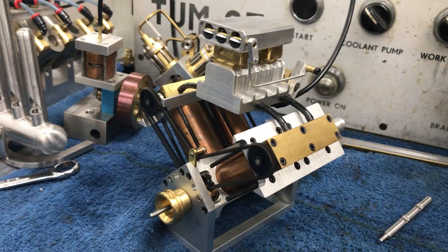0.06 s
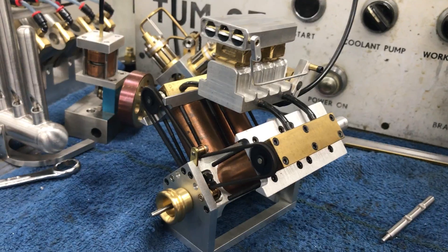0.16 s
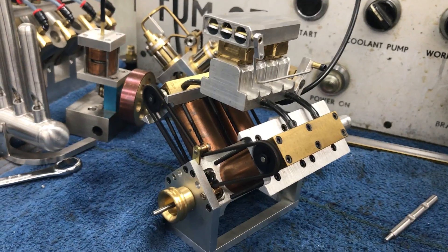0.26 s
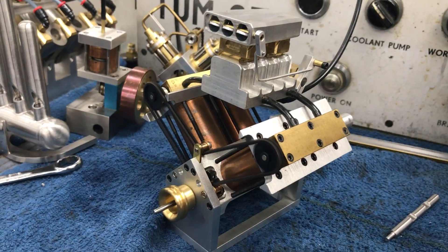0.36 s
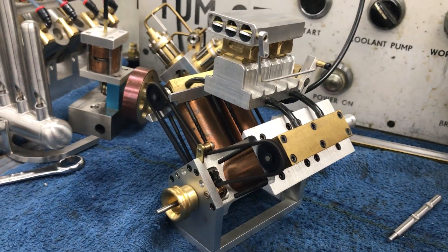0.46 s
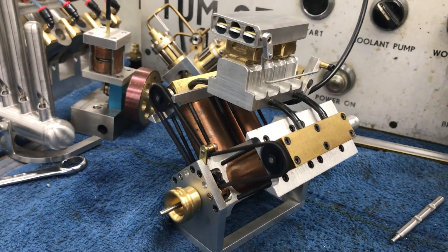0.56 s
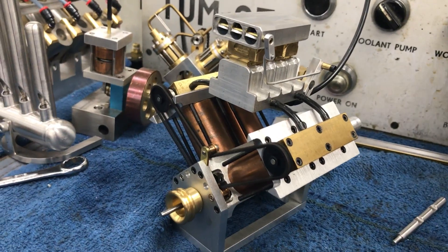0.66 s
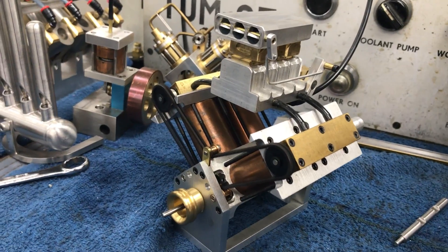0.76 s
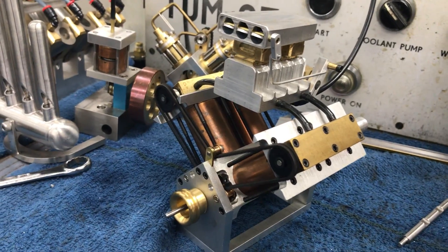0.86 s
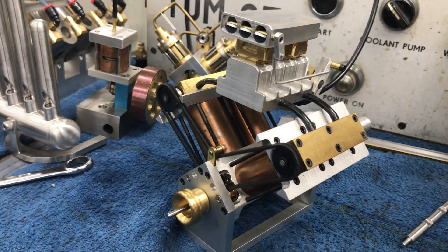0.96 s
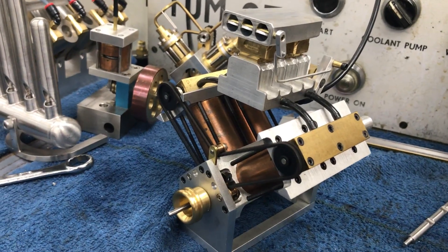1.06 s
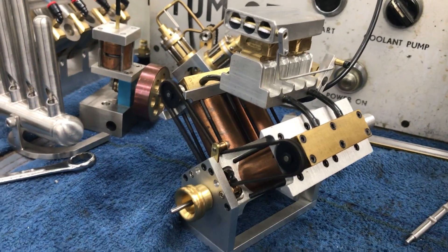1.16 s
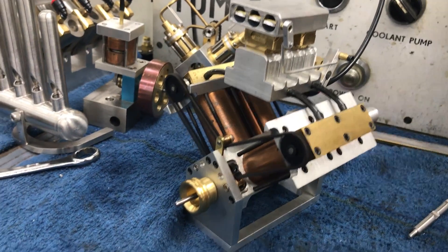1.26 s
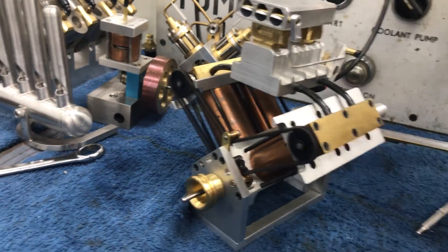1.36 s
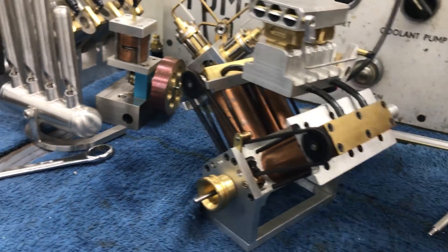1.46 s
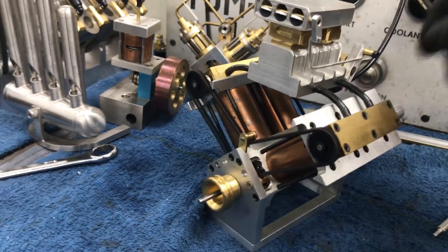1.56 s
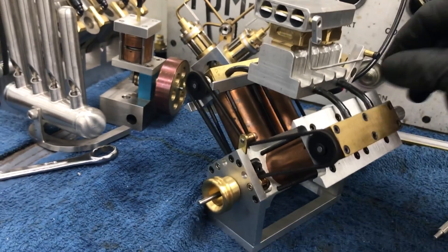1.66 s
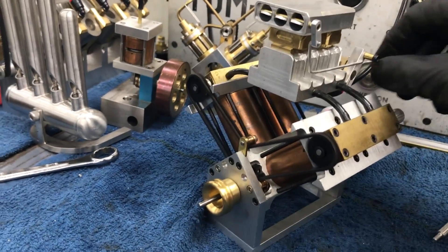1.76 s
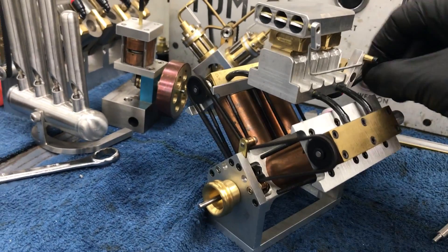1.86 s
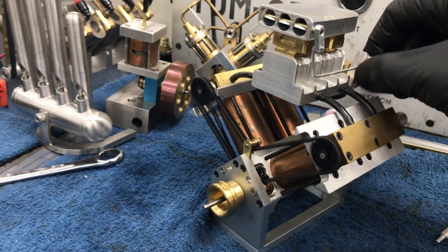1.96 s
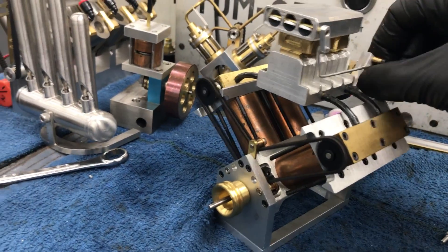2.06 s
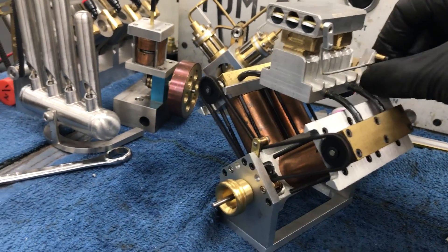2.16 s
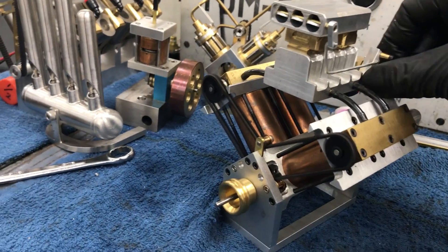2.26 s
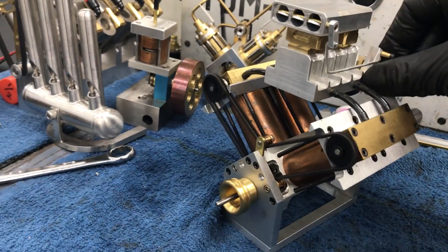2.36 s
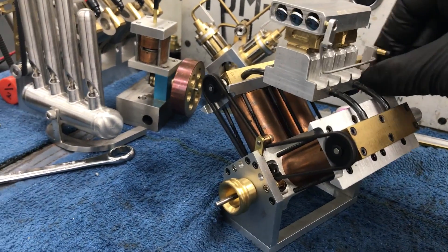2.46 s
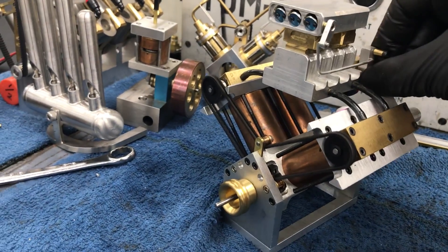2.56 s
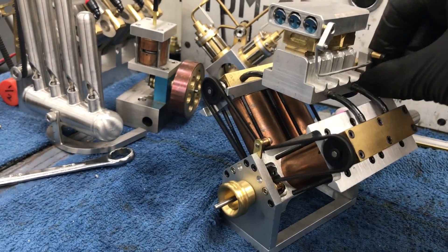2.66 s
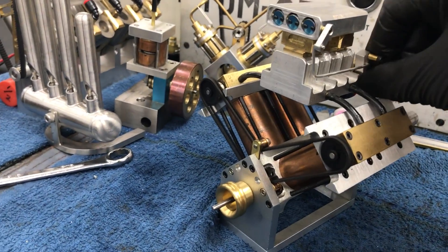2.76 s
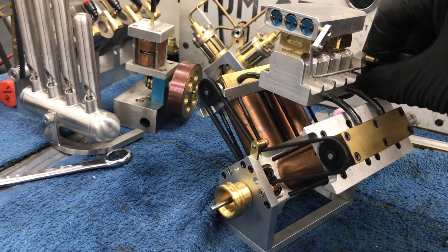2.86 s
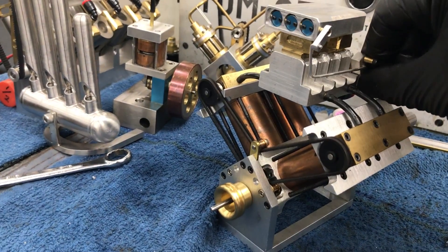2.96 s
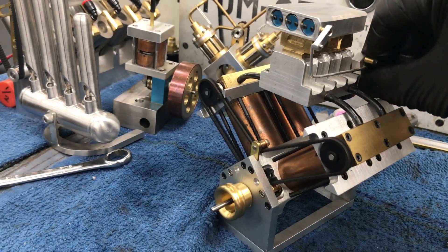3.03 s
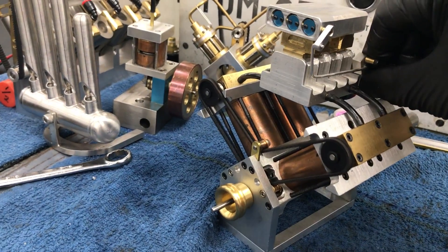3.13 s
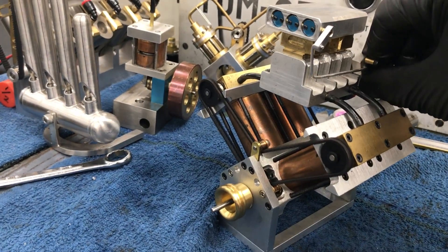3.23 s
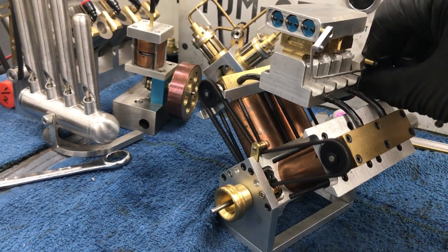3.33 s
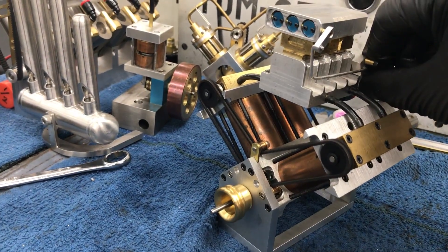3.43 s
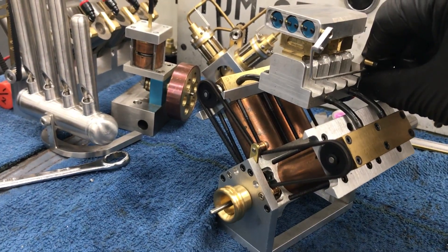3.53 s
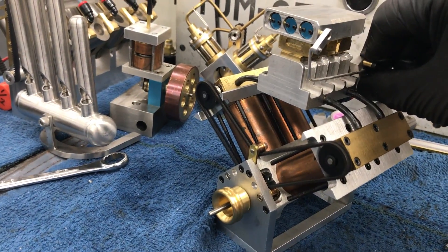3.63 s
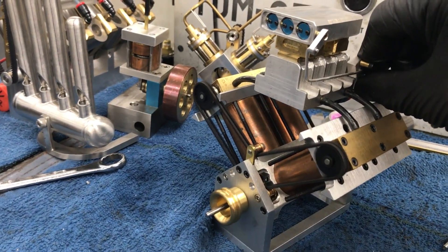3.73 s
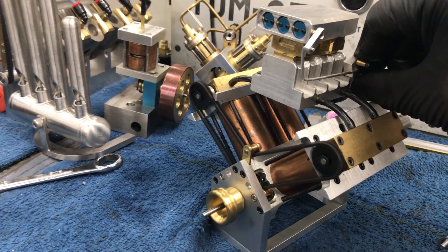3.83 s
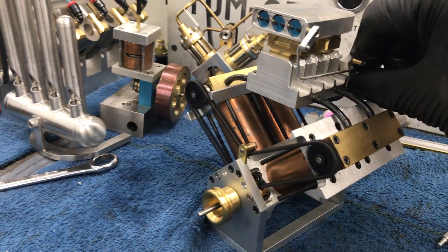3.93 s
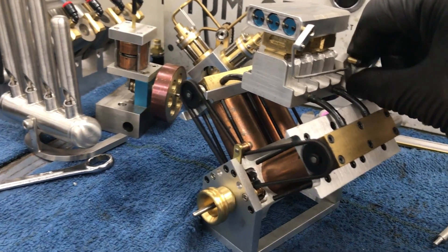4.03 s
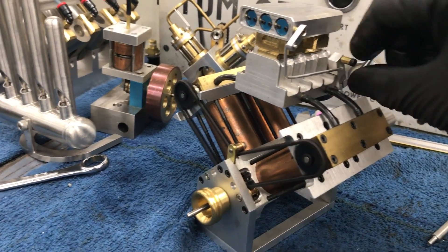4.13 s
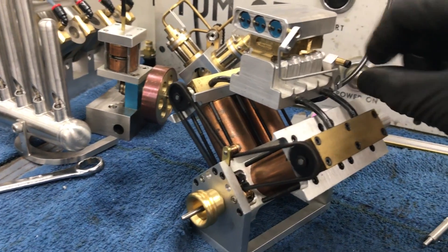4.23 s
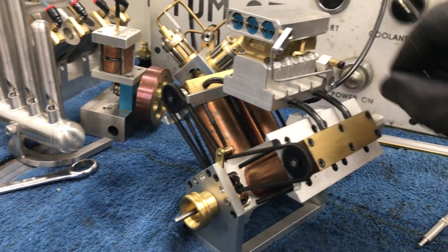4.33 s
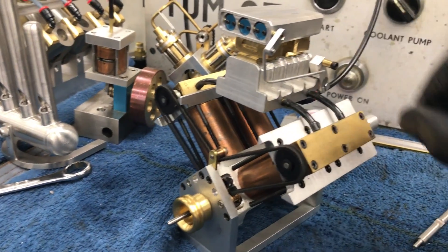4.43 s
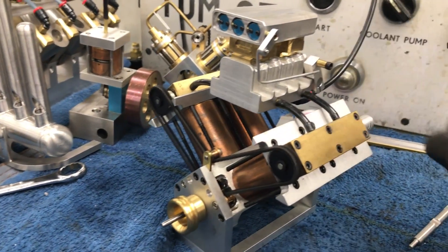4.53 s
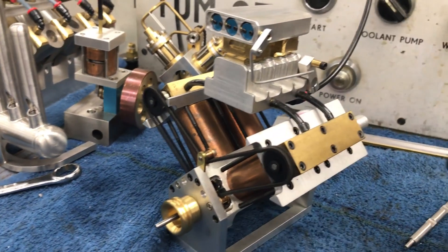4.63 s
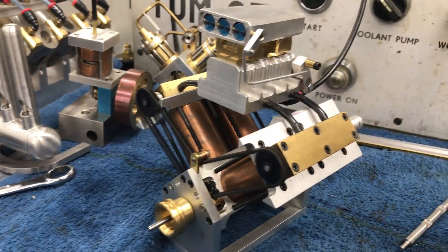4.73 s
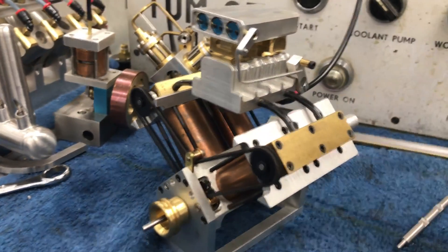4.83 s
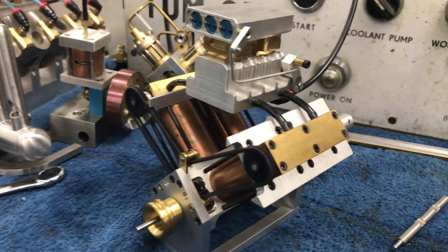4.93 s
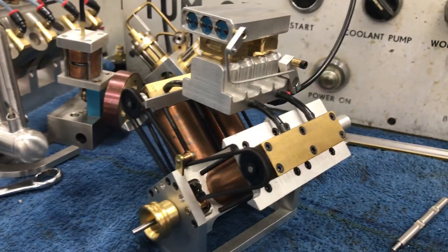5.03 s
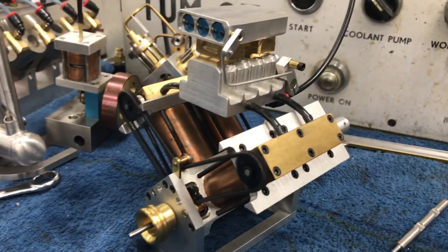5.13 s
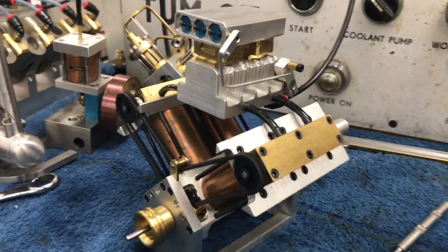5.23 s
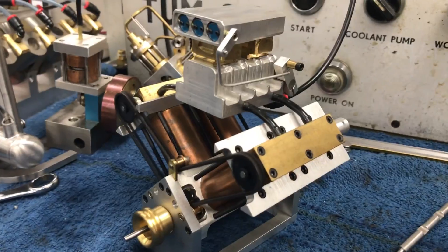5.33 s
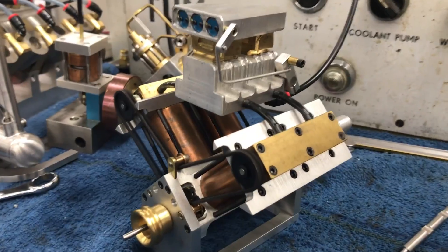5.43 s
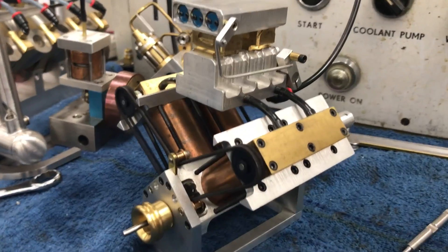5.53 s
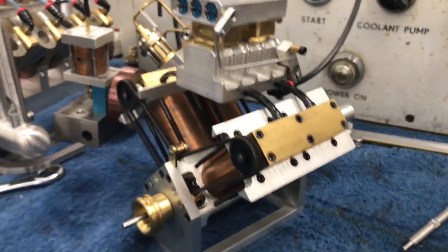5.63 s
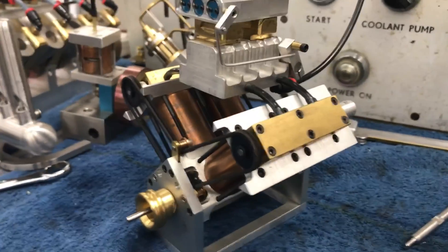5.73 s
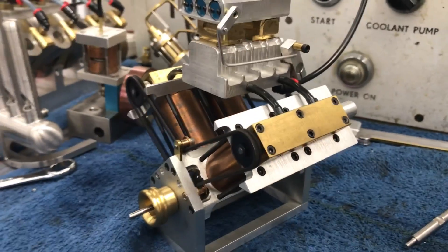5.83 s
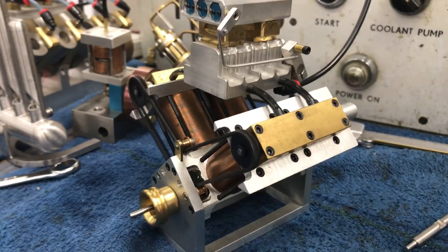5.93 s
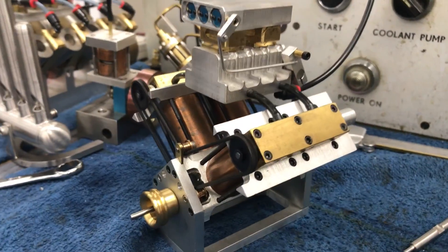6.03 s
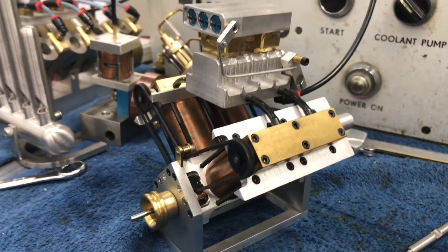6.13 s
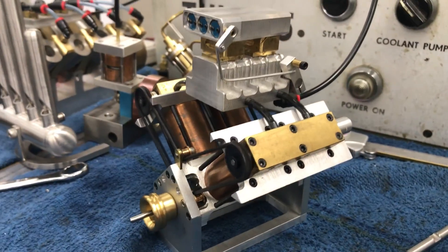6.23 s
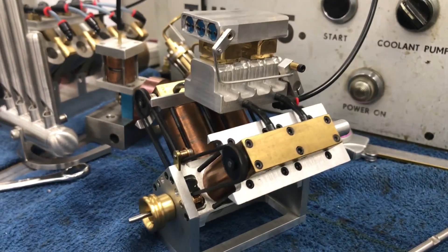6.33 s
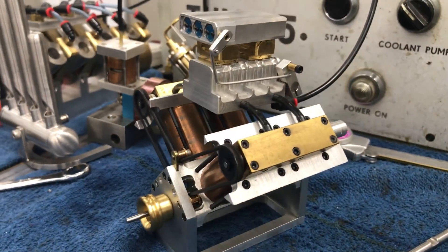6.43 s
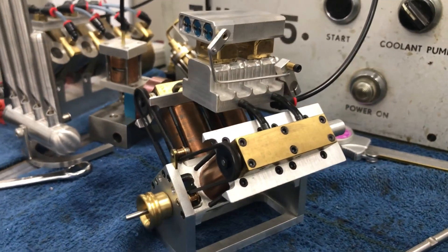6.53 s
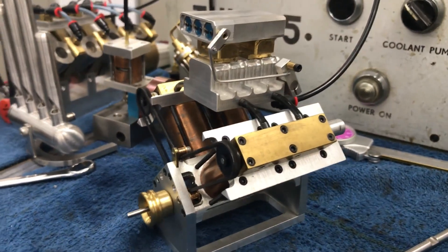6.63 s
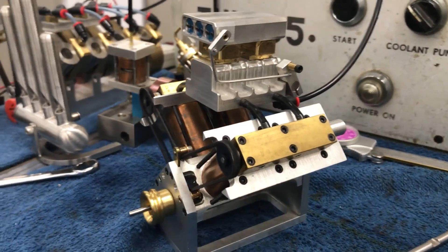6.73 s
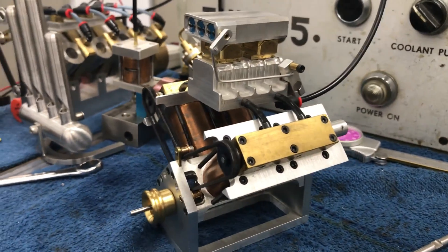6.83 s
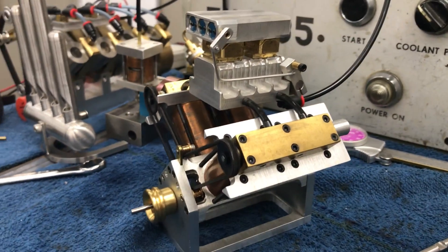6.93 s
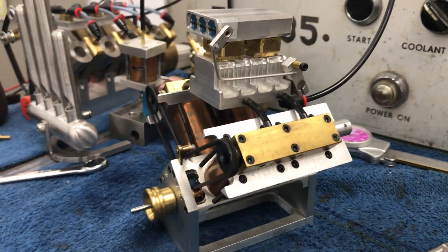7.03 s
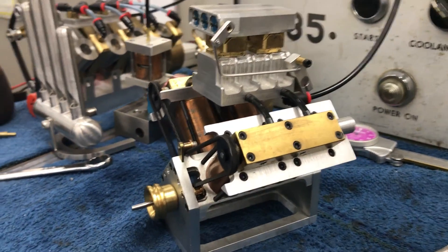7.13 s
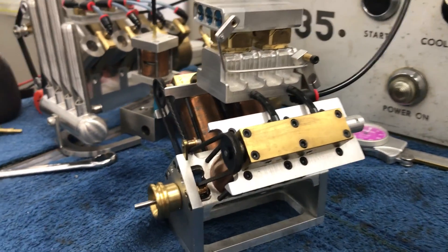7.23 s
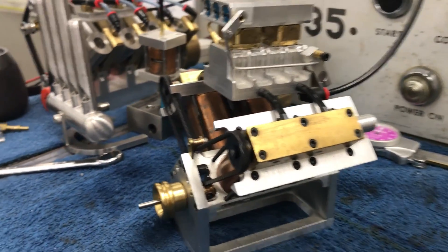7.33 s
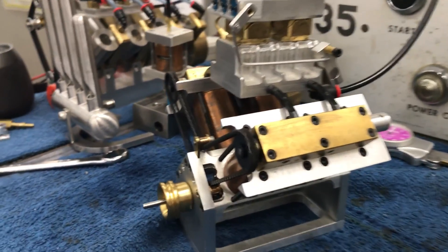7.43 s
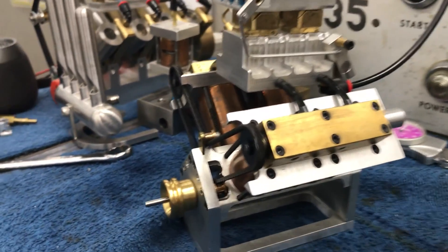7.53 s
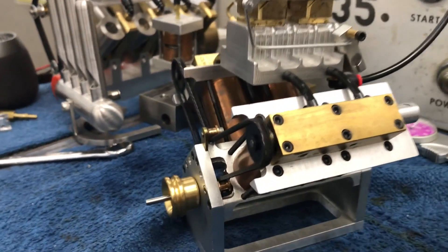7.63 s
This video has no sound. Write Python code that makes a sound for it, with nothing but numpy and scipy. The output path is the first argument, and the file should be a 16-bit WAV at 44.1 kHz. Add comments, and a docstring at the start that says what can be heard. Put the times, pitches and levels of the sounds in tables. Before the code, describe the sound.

Rapid paired steam barks and thumps over bright hiss slow abruptly at three seconds to quiet, airy, rhythmic spitting and faint whistles.

```python
"""On a workshop bench a model V-twin steam engine runs close to the microphone, at nearly ten turns a second.
Each turn both cylinders exhaust: enveloped noise barks, and pulses of flow, differentiated, thump.
Jet noise hisses through the valve ports in step with the crank, over a motor's hum of sines and a low rumble.
The throttle is closed: the engine drops to half speed and ticks over with soft spits, whistles and hiss."""
import sys
import numpy as np
from scipy import signal
from scipy.fft import rfft, irfft, next_fast_len
from scipy.io import wavfile
from scipy.ndimage import uniform_filter1d, map_coordinates

SR = 44100
rng = np.random.default_rng(int(sys.argv[2]) if len(sys.argv) > 2 else 0)


def output_pcm(signal):
    """Save a mono or channel-first signal as 16-bit PCM at the path in sys.argv[1].

    Samples are clipped to [-1, 1] before scaling.
    """
    pcm = np.clip(np.atleast_2d(signal).T, -1, 1) * 32767
    wavfile.write(sys.argv[1], SR, np.round(pcm).astype(np.int16))


N = 338688
TIME = np.arange(N) / SR


def amp(db):
    """Level to gain: 20 dB is a factor of ten in amplitude."""
    return 10 ** (np.asarray(db) / 20)


def unit(x):
    """Normalization: x at rms 1."""
    return x / np.sqrt(np.mean(x ** 2) + 1e-20)


def along(points, hz):
    """Logarithmic frequency scale: (f/Hz, value) points interpolated on it."""
    f, v = np.transpose(points)
    return np.interp(np.log(hz + 1), np.log(f + 1), v)


def curve(rows):
    """Linear interpolation: (t/s, value) rows to one value per sample."""
    return np.interp(TIME, *np.transpose(rows))


def wobble(rate):
    """Band-limited fluctuation: a smooth curve through random knots, rate of them a second."""
    knots = rng.standard_normal(int(N * rate / SR) + 4)
    return map_coordinates(knots, [TIME * rate])


def filtered(x, response):
    """Linear filtering: the spectrum of x times a complex response of frequency."""
    size = next_fast_len(N + SR // 2)
    return irfft(rfft(x, size) * response(np.fft.rfftfreq(size, 1 / SR)), size)[:N]


def coloured(x, spectrum):
    """Spectral shaping: x weighted by (f/Hz, level/dB) points, at rms 1."""
    return unit(filtered(x, lambda hz: amp(along(spectrum, hz))))


def jet(spectrum, whistle_db, sputter_db):
    """Turbulent jet noise: brief narrow whistles come and go, and the flow sputters."""
    z = signal.stft(rng.standard_normal(N), nperseg=1024)[2]
    field = uniform_filter1d(rng.standard_normal(z.shape), size=5, axis=0)  # across frequency
    field = uniform_filter1d(field, size=3, axis=1)  # across time
    noise = signal.istft(z * amp(whistle_db * unit(field)), nperseg=1024)[1][:N]
    return coloured(noise * amp(sputter_db * wobble(1500)), spectrum)


def puff(t, rise, fall):
    """Transient envelope: a rounded burst of gain 1 at t = 0, with exponential flanks."""
    return 2 / (np.exp(np.minimum(-t / rise, 50)) + np.exp(np.minimum(t / fall, 50)))


def around(s):
    """Time window: the samples near time s, and their times from it."""
    span = slice(max(0, int(s * SR) - SR // 20), min(N, int(s * SR) + SR // 10))
    return span, TIME[span] - s


def repeated(times, shape):
    """Superposition: one envelope shape(t), laid down at each of the times."""
    level = np.zeros(N)
    for s in times:
        span, t = around(s)
        level[span] += shape(t)
    return level


# hum of a motor somewhere in the workshop: [f/Hz, rms level/dB]
MOTOR_HUM = [(29.6, -69), (58.6, -51.5), (91.3, -52.5), (119.8, -55.5), (213.5, -66), (239.8, -66.5),
             (286.5, -67.5), (359.8, -74), (382, -66), (393, -70), (429.3, -70), (480, -79)]
# colours of the low rumble and of the faint rush of air: [f/Hz, level/dB]
RUMBLE_COLOUR = [(20, -40), (35, -14), (50, -3), (75, -0.5), (105, -2.5), (130, 0.5), (155, -7),
                 (200, -9.5), (250, -18), (320, -16.5), (380, -26), (470, -38), (700, -45), (1300, -120)]
AIR_COLOUR = [(150, -23), (450, -9.5), (1050, 0.5), (2000, -13.5), (5000, -0.5), (16000, -33)]


def workshop():
    """Frequency modulation: a motor's partials drift together, over shaped noise for rumble and air."""
    motor_time = TIME + 0.00041 * wobble(1.43)
    hum = np.zeros(N)
    for hz, db in MOTOR_HUM:
        hum += amp(db) * np.sqrt(2) * np.sin(2 * np.pi * (hz * motor_time + rng.random()))
    rumble = amp(-46.0) * coloured(rng.standard_normal(N), RUMBLE_COLOUR)
    air = amp(-50.0) * coloured(rng.standard_normal(N), AIR_COLOUR)
    return hum + rumble + air


# crank speed: [t/s, speed/(turns per s)]
CRANK_SPEED = [(0.0, 9.7864), (1.62, 9.6971), (2.26, 9.7576), (2.7, 9.4537), (2.91, 8.2006), (3.14, 4.8683),
               (3.29, 4.8837), (4.04, 4.7162), (4.28, 4.9351), (4.42, 4.7731), (6.25, 4.7013),
               (6.35, 4.7884), (7.68, 4.734)]
FIRST_BLOW_S = .0775  # the front cylinder's first exhaust


def crank():
    """Kinematics: angle in turns is the integral of speed; the front exhausts at each whole turn."""
    turns = np.cumsum(curve(CRANK_SPEED)) / SR
    return turns - np.interp(FIRST_BLOW_S, TIME, turns)


# throttle: [t/s, opening 0-1]
THROTTLE = [(2.63, 1), (2.8, 0.78), (2.95, 0.56), (3.1, 0)]


def throttle_opening():
    """Flow control: the throttle's opening at each sample, 0 to 1."""
    return np.clip(curve(THROTTLE), 0, 1)


# port opening from the front exhaust, under power and ticking over: [turn 0-1, level/dB]
PORTS_DRIVEN = [(0, 5), (.05, -2.5), (.115, 2.5), (.22, -2.5), (.32, -6.5), (.352, 6), (.44, 3.5),
                (.53, 2.3), (.58, 1.5), (.72, -1.5), (.93, -5)]
PORTS_IDLE = [(0, 8.5), (.06, -5), (.135, 5), (.21, 3.5), (.28, -8.5), (.385, -1), (.44, 6), (.5, 0),
              (.62, 6), (.73, -1.3), (.92, -2.5)]
# colour of the hiss under power, and ticking over from the front and the side: [f/Hz, level/dB]
JET_DRIVEN = [(400, -34), (1000, -20.5), (2200, -18.5), (4400, -7), (5100, -11.5), (6700, -6), (8300, -4.5),
              (9100, -2), (10350, -4), (11000, 1.5), (12200, -3.5), (14200, -3), (15800, -8), (17100, -5.5)]
JET_FRONT = [(450, -22), (1050, -14.5), (2000, -17), (3400, -10.5), (4500, -2.5), (4950, -7.5),
             (6200, -0.5), (8200, -3.5), (9200, 0.5), (10300, -4), (11500, -0.5), (14200, 0.5),
             (15700, -4.5), (17100, -2)]
JET_SIDE = [(450, -22), (1050, -15.5), (2000, -20), (3300, -10.0), (4400, -5), (4950, -10), (6500, 3.5),
            (7600, -1), (10300, -5), (11800, -1), (12900, -4.5), (14000, 3.6), (15700, -8), (17100, -9)]
# narrow fixed peaks colouring the hiss under power: [f/Hz, width/Hz, boost/dB]
HISS_RINGS = [(1660, 480, 5.5), (7060, 470, 2), (9450, 110, 1), (12000, 860, 4.5), (14400, 900, 3.5)]
HISS_DRIVEN_DB, HISS_IDLE_DB = -16, -26.5  # throttle open, throttle shut
LOW_HISS_HZ, LOW_HISS_DEPTH = 7260, 0.52  # below this the hiss pulses less, as a share of the swing in dB


def port_hiss():
    """Amplitude modulation: leaking steam swells with the crank, most in the treble; throttle sets level, colour."""
    angle, throttle = crank(), throttle_opening()

    def pulsed(steam, ports):
        opening_db = np.interp(angle, *np.transpose(ports), period=1)
        low = filtered(steam, lambda hz: 1 / (1 + (hz / LOW_HISS_HZ) ** 6))
        low_swing = unit(amp(LOW_HISS_DEPTH * opening_db))
        return low * low_swing + (steam - low) * unit(amp(opening_db))

    def rings(hz):
        return amp(sum(db / (1 + (2 * (hz - centre) / width) ** 2) for centre, width, db in HISS_RINGS))

    driven_jet = unit(filtered(jet(JET_DRIVEN, whistle_db=1.5, sputter_db=0.6), rings))
    driven = pulsed(driven_jet, PORTS_DRIVEN)
    side = np.clip(curve([(4.6, 0), (6.3, 0.89)]), 0, 1)  # the microphone drifts round the engine
    front_jet = jet(JET_FRONT, whistle_db=2.5, sputter_db=-0.1)
    side_jet = jet(JET_SIDE, whistle_db=3.5, sputter_db=0.5)
    idle = pulsed(np.sqrt(1 - side) * front_jet + np.sqrt(side) * side_jet, PORTS_IDLE)
    flow = np.sqrt(throttle) * driven + np.sqrt(1 - throttle) * idle
    level_db = HISS_IDLE_DB + (HISS_DRIVEN_DB - HISS_IDLE_DB) * throttle
    return amp(level_db + 0.72 * wobble(60)) * flow


# how far the rear exhaust trails the front one; further once the crank coasts: [t/s, lag/turns]
REAR_LAG = [(2.6, 0.385), (2.95, .44)]


def strokes():
    """Uneven firing, as in any V-twin: exhaust times of the front and the rear cylinder."""
    def whole_turns(angle):
        return TIME[1:][np.diff(np.floor(angle)) > 0]

    angle = crank()
    return whole_turns(angle), whole_turns(angle - curve(REAR_LAG))


# how hard the cylinders work under power: [t/s, level/dB]
EFFORT = [(.08, 2), (.18, -0.5), (.3, 0.5), (.65, 2.5), (1.2, 0.2), (1.35, -1), (1.82, -2), (1.93, 3),
          (2.06, 0), (2.44, 3), (2.54, -1.5), (2.66, 0)]
POWER_OFF_S = 2.9  # strokes from here on make no bark or thump
REAR_FOLLOWS = 0.36  # share of the swings in effort that the rear cylinder follows
FRONT_STARVED_DB, REAR_STARVED_DB = -30, -55  # loss of effort, were the throttle fully shut


def blows():
    """Throttling starves the cylinders: powered strokes as (t/s, effort/dB, is it the front)."""
    front, rear = strokes()

    def effort(s):
        return np.interp(s, *np.transpose(EFFORT))

    def shut(s):
        return 1 - np.interp(s, *np.transpose(THROTTLE))

    front_blows = [(s, effort(s) + FRONT_STARVED_DB * shut(s), True) for s in front]
    rear_blows = [(s, REAR_FOLLOWS * effort(s) + REAR_STARVED_DB * shut(s), False) for s in rear]
    return sorted(blow for blow in front_blows + rear_blows if blow[0] < POWER_OFF_S)


# colour of a bark: [f/Hz, level/dB]
BARK_COLOUR = [(25, -24), (120, 3), (300, -3), (600, -0.5), (1050, 2.5), (1500, -1), (2100, -2), (2900, -4),
               (3900, -5), (5000, -9.5), (6700, -27), (10000, -11), (16000, -25)]
FRONT_BARK_DB, REAR_BARK_DB = -14, -17.5  # at an effort of 0 dB
BARK_SCATTER_DB = .5  # from stroke to stroke


def barks():
    """Blowdown noise: each release tears out roughly; a weaker puff follows as the piston sweeps the cylinder."""
    level, powered = np.zeros(N), blows()
    chances = rng.standard_normal((len(powered), 2))
    for (s, effort_db, is_front), (size, chance) in zip(powered, chances):
        span, t = around(s)
        if is_front:
            second = amp(-12.5 + 2.5 * chance) * puff(t - .012, 0.0023, 0.0033)
            shape = amp(FRONT_BARK_DB) * (puff(t + 0.00053, 0.001, 0.002) + second)
        else:
            second = amp(-15.0 + 1.7 * chance) * puff(t - .021, 0.0036, 0.0025)
            shape = amp(REAR_BARK_DB) * (puff(t + 0.002, .0013, 0.0046) + second)
        level[span] += amp(effort_db + BARK_SCATTER_DB * size) * shape
    return level * jet(BARK_COLOUR, whistle_db=1.0, sputter_db=3.5)


FRONT_THUMP_DB, REAR_THUMP_DB = -69, -70.3  # flow at an effort of 0 dB, before its rate of change is taken
THUMP_GROWS = 1.5  # dB of thump per dB of effort
THUMP_SCATTER_DB = 1.7  # from stroke to stroke


def thumps(low_hz=54, damping=0.64, cut_hz=32, front_s=0.0017, rear_s=0.0026, gulp=0.09):
    """Monopole radiation: pressure follows the rate of change of flow; the microphone's bass cut makes it swing."""
    flow, powered = np.zeros(N), blows()
    chances = rng.standard_normal((len(powered), 4))

    def slug(t, width):
        return np.exp(-(t / width) ** 2 / 2)

    for (s, effort_db, is_front), (size, early, late, wide) in zip(powered, chances):
        span, t = around(s + 0.00066 * early)
        spread = amp(1.4 * wide)
        if is_front:
            second = amp(-12.5 + 2 * late) * slug(t - .008, 0.0057)
            shape = amp(FRONT_THUMP_DB) * (slug(t - .0028, front_s * spread) + second)
        else:
            shape = amp(REAR_THUMP_DB) * slug(t - .003, rear_s * spread)
        flow[span] += amp(THUMP_GROWS * effort_db + THUMP_SCATTER_DB * size) * shape
    gulps = flow * (1 + gulp * wobble(900))  # the slug leaves unevenly

    def bass_cut(hz):
        return -hz ** 2 / (low_hz ** 2 - hz ** 2 + 1j * damping * low_hz * hz)

    def rumble_cut(hz):
        return 1j * hz / (1j * hz + cut_hz)

    return filtered(np.gradient(gulps) * SR, lambda hz: bass_cut(hz) * rumble_cut(hz))


# strength of the spits: [t/s, level/dB]
SPIT_LEVEL = [(2.55, -21), (3, -16.5), (3.18, -19), (4.45, -17.5), (5.1, -17), (6.3, -16.5), (7.6, -14.5)]
# colours of the front's spit, the rear's puff, the rear valve's tick, the front valve's squirt: [f/Hz, level/dB]
SPIT_COLOUR = [(500, -33.5), (2000, -32.5), (2900, -12), (4300, -2.5), (5000, -11.5), (6000, 2),
               (7000, 0.5), (7800, -5.5), (8600, -3), (9700, -2), (10400, -12), (11100, -9), (13500, -24),
               (17000, -8.5)]
PUFF_COLOUR = [(200, -39), (1100, -24), (2100, -27), (3500, -4), (5000, -25), (6600, 1), (9000, -7),
               (11800, -0.5), (14000, -7), (17000, -8)]
TICK_COLOUR = [(300, -27), (800, 3), (1300, -5), (2000, -7), (5000, -14), (12000, -30)]
CRACK_COLOUR = [(1500, -28), (2800, -14), (3500, -4.5), (5000, -10), (6600, 2), (7500, -9), (12000, -28)]
SPIT_DB, PUFF_DB = 2, -6.5  # front and rear cylinder against that strength
# the rear valve's tick: level, lead on its stroke, decay
TICK_DB, TICK_LEAD_S, TICK_FALL_S = -45, 0.0066, .003
# the front valve cracks open just before its blow: level under power, lead, decay
CRACK_DB, CRACK_LEAD_S, CRACK_FALL_S = -23.5, 0.0086, 0.0035


def spits(spit_s=0.0034, lag_s=0.00027):
    """Pulsed jets: the front valve squirts and spits each turn; at tick-over the rear adds a tick and soft puff."""
    front, rear = strokes()
    idling = (1 - throttle_opening()) ** 2
    crack = repeated(front, lambda t: puff(t + CRACK_LEAD_S, 0.0012, CRACK_FALL_S))
    spit = repeated(front, lambda t: np.exp(-((t - lag_s) / spit_s) ** 2 / 2))
    answer = repeated(rear, lambda t: puff(t + 0.0017, 0.0037, 0.01))
    tick = repeated(rear, lambda t: puff(t + TICK_LEAD_S, 0.00035, TICK_FALL_S))
    squirt = amp(CRACK_DB - 8 * idling) * crack * jet(CRACK_COLOUR, whistle_db=3.0, sputter_db=1.5)
    sharp = amp(SPIT_DB) * spit * jet(SPIT_COLOUR, whistle_db=2.7, sputter_db=1.3)
    soft = amp(PUFF_DB) * answer * jet(PUFF_COLOUR, whistle_db=2.5, sputter_db=2.0)
    valve = amp(TICK_DB) * tick * coloured(rng.standard_normal(N), TICK_COLOUR)
    return squirt + amp(curve(SPIT_LEVEL)) * (sharp + idling * soft) + idling * valve


# the rear port whistles as its piston sweeps, ticking over: [turn 0-1, f/Hz, level/dB]
WHISTLE = [(.48, 9200, -53), (.57, 10650, -31.5), (.66, 11550, -31), (.76, 12400, -34), (.98, 12480, -50)]
WHISTLE_KNOTS_PER_S = 1300  # more knots, a wider and breathier band


def whistle():
    """Narrow-band noise on a gliding carrier: a breathy rise from the rear port each turn, throttle shut."""
    angle = crank()
    turn, pitch, level_db = np.transpose(WHISTLE)
    phase = 2 * np.pi * np.cumsum(np.interp(angle, turn, pitch, period=1)) / SR
    in_phase = wobble(WHISTLE_KNOTS_PER_S) * np.cos(phase)
    quadrature = wobble(WHISTLE_KNOTS_PER_S) * np.sin(phase)
    level = amp(np.interp(angle, turn, level_db, period=1))
    return (1 - throttle_opening()) * level * unit(in_phase + quadrature)


# the room's ring: [f/Hz, t60/s]
ROOM_RING = [(100, 0.12), (1000, 0.081), (12000, 0.38)]


def room(x):
    """Reverberation: a short diffuse tail from bench and walls, decaying exponentially in each band."""
    hz, t, z = signal.stft(rng.standard_normal(SR // 3), SR, nperseg=256)
    decay = amp(-60 * t / along(ROOM_RING, hz)[:, None])
    tail = signal.istft(z * decay, SR, nperseg=256)[1]
    delayed = np.pad(tail / np.linalg.norm(tail), (SR // 300, 0))
    return signal.fftconvolve(x, delayed)[:N]


def scene():
    """Absorption: the engine stands on a soft towel, so little of the room is heard."""
    engine = port_hiss() + whistle() + barks() + thumps() + spits()
    return (engine + amp(-22.0) * room(engine) + workshop())[None]


TOP_HZ = 17280  # the recorder's band limit


def record(dry):
    """Saturation and band limiting: the recorder rounds off the highest peaks, then cuts the top."""
    rounded = dry[0] / (1 + np.abs(dry[0]) ** 6) ** (1 / 6)
    return filtered(rounded, lambda hz: hz < TOP_HZ)[None]


dry = scene()
out = record(dry)
output_pcm(out)
```